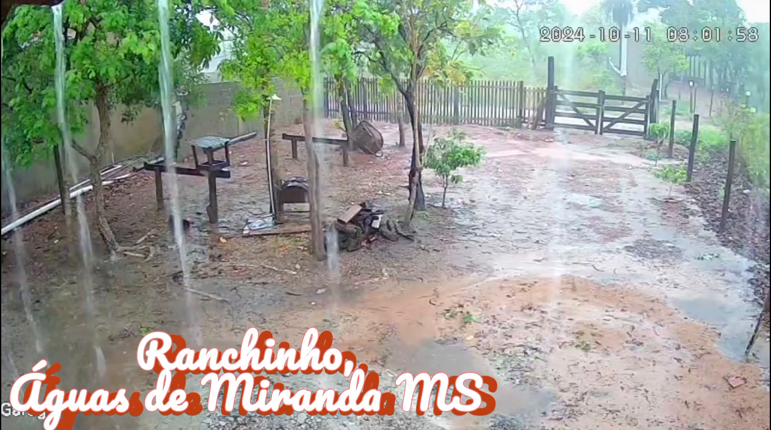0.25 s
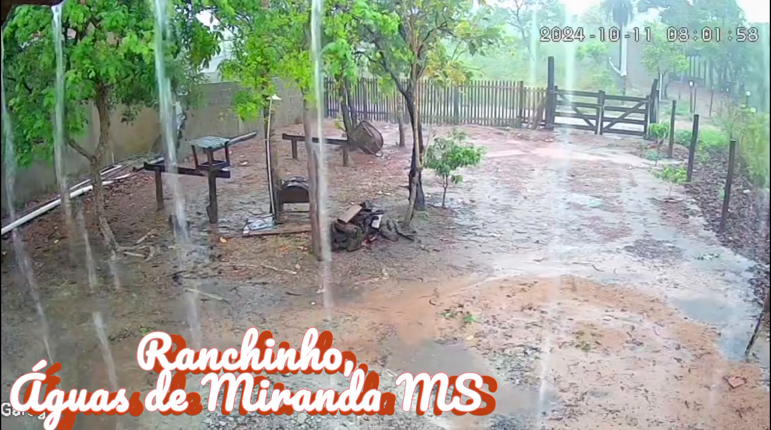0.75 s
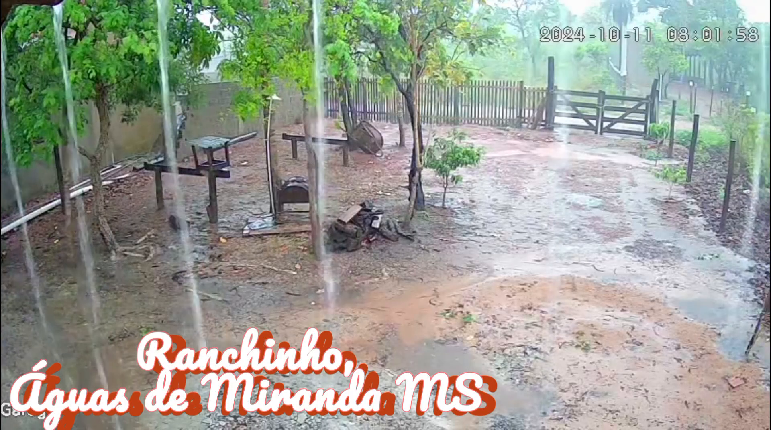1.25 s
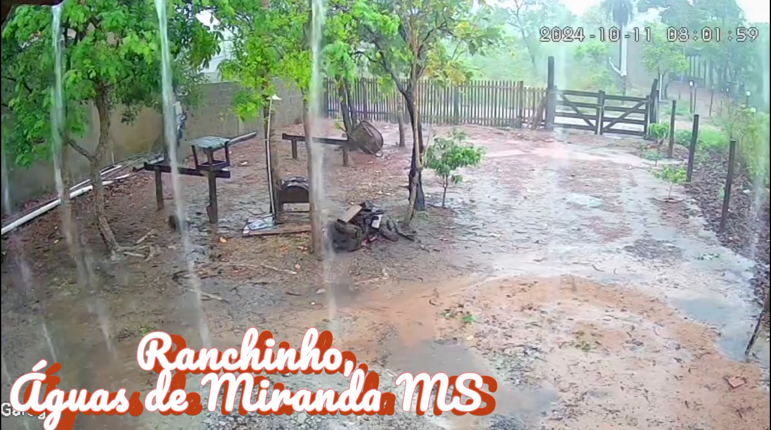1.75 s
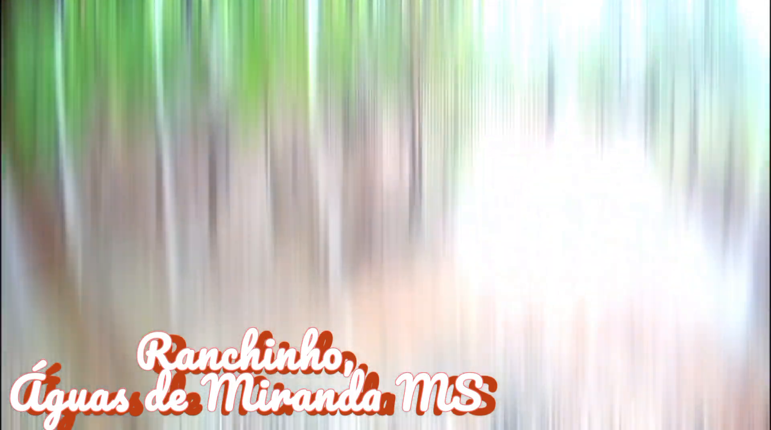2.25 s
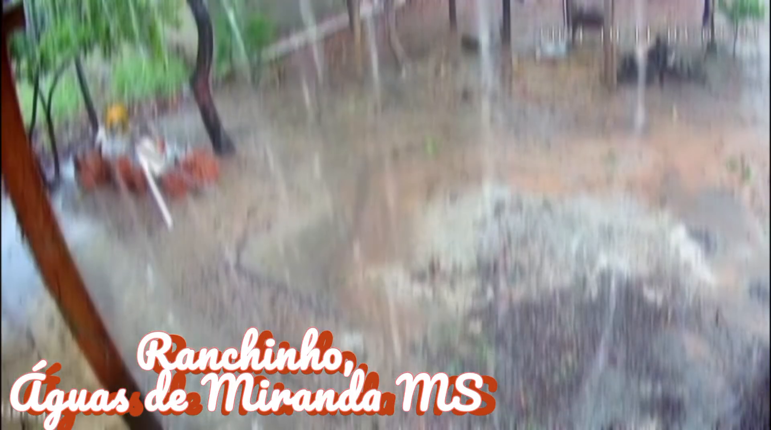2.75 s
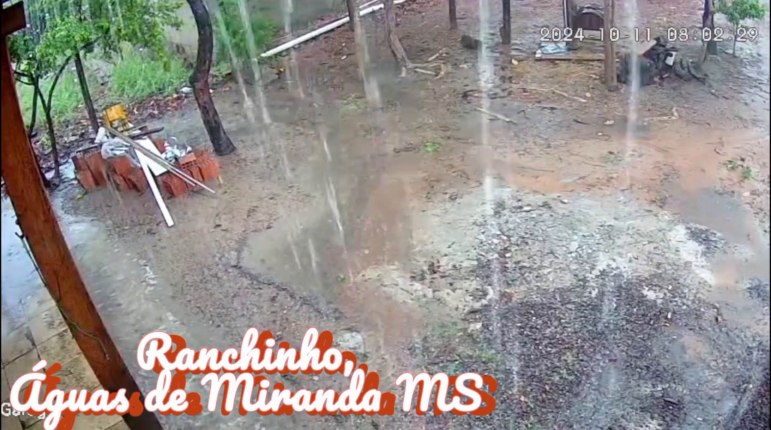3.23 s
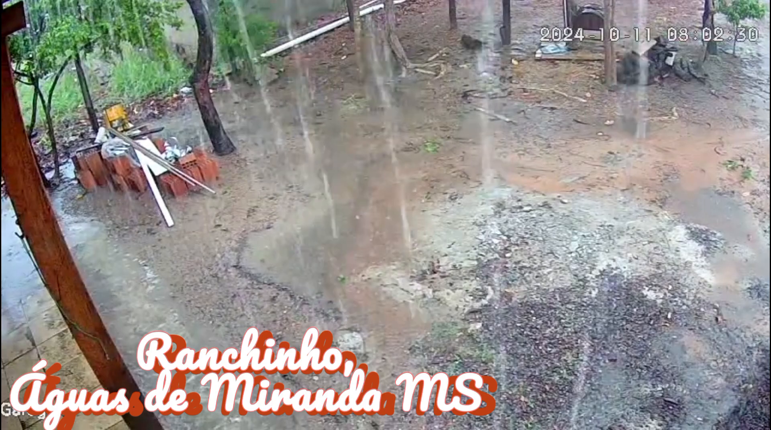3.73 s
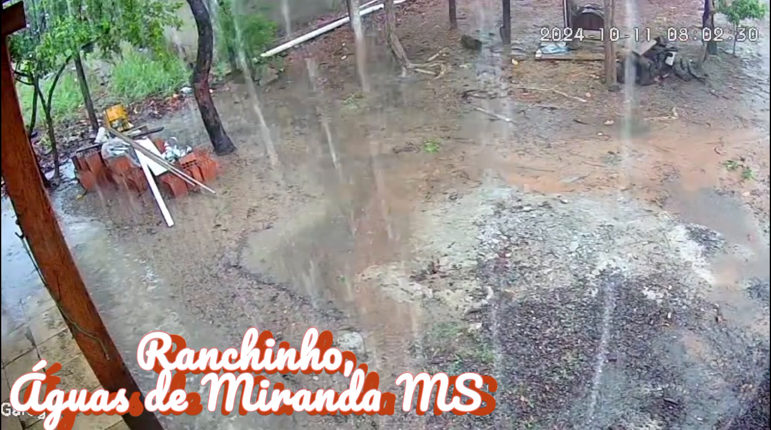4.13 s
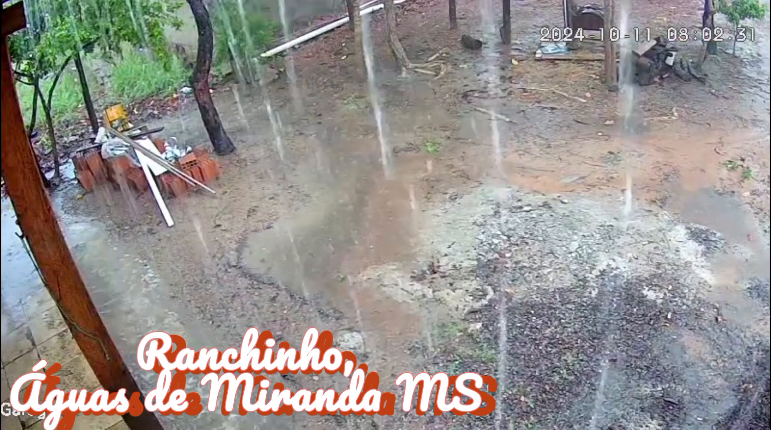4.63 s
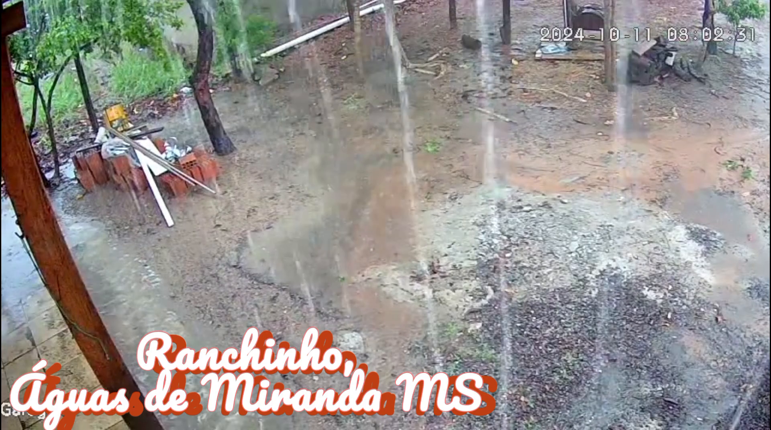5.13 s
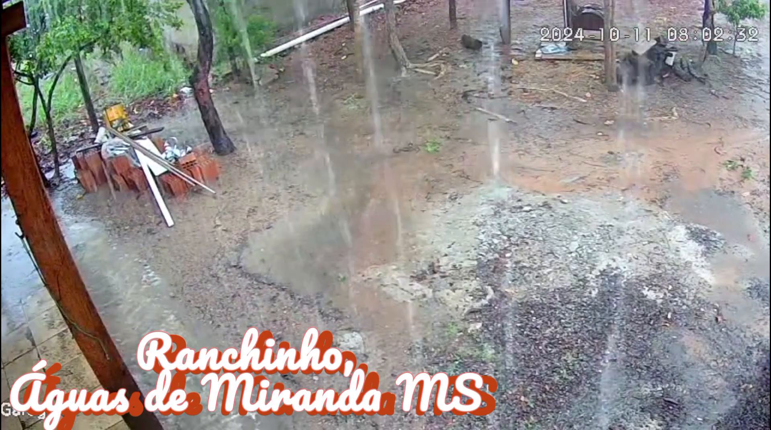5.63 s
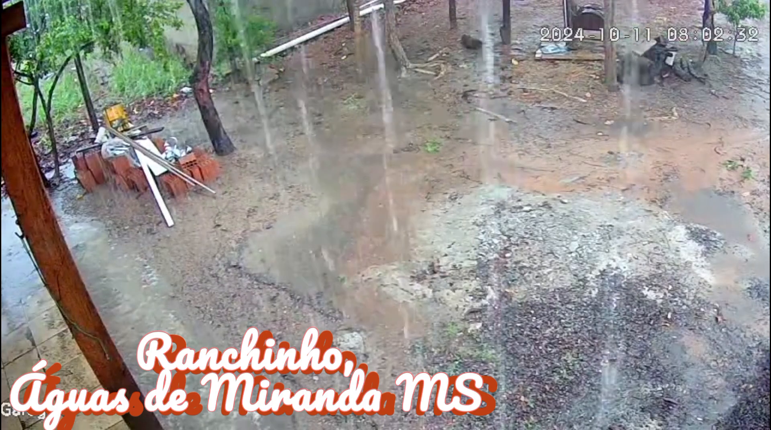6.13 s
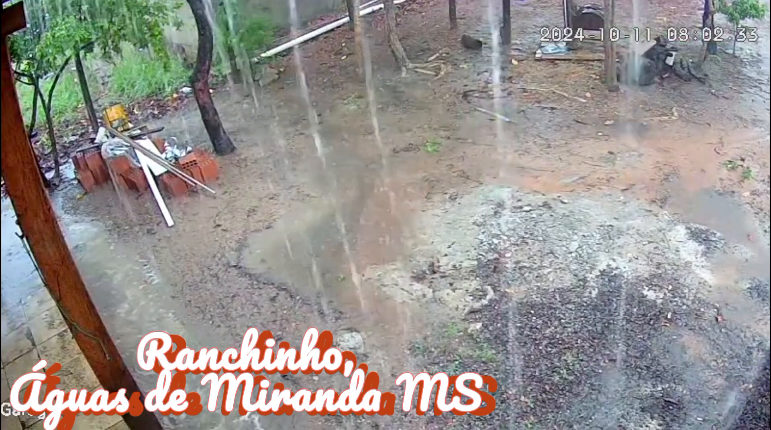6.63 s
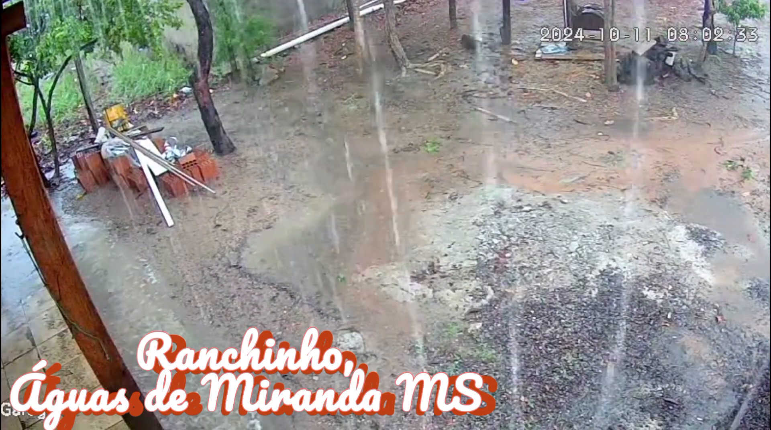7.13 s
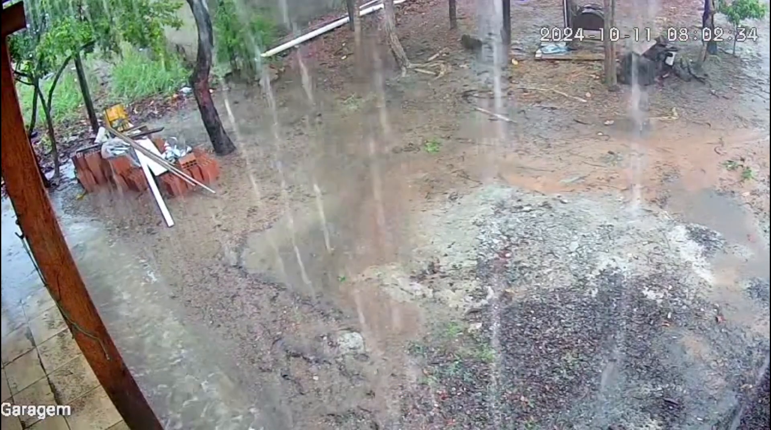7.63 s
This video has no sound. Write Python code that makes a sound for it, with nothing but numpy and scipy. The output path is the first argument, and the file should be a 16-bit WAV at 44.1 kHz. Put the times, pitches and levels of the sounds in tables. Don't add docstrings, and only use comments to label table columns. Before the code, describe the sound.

Quiet, thin rain hiss with scattered soft drips, then an abrupt jump to a loud downpour with sharp wet splats and low roof drumming.

```python
import sys
import numpy as np
from scipy import signal
from scipy.fft import rfft, irfft
from scipy.io import wavfile
from scipy.ndimage import uniform_filter1d

SR = 44100
rng = np.random.default_rng(int(sys.argv[2]) if len(sys.argv) > 2 else 0)


def boost(x):
    u = np.asarray(x, float) / 20
    return 10 ** u


def int16_out(signal):
    q = np.round(np.clip(np.atleast_2d(signal).T, -1, 1) * 32767)
    wavfile.write(sys.argv[1], SR, q.astype(np.int16))


N = 347508
CUT_S = 2.4335
DOWNPOUR, GUST = 1, 2


def by_camera(far, near):
    return np.where(np.arange(N) < CUT_S * SR, far, near)


def rain_db(column):
    # time in seconds, downpour level in dB, level of gusts on the roof in dB.
    rain = [
        [(0, -34, -50), (.3, -36.5, -50), (.48, -39.5, -51), (.76, -41, -47), (.82, -36.5, -51),
         (1.0, -39, -43.5), (1.17, -40, -57.5), (1.36, -42.5, -48), (1.5, -41.5, -54), (2.433, -43, -55)],
        [(2.434, -25, -32), (2.8, -24, -30), (3.3, -24.5, -32.5), (3.6, -24.5, -34), (4.8, -24.5, -34.5),
         (5.9, -24, -30.5), (6.6, -24, -33), (7.88, -23.5, -34)],
    ]
    rows = np.vstack(rain)
    return np.interp(np.arange(N) / SR, rows[:, 0], rows[:, column])


def evened(x):
    return x / np.sqrt(np.mean(x ** 2) + 1e-20)


def read(points, hz):
    f, value = np.transpose(points)
    return np.interp(np.log(hz + 1), np.log(f + 1), value)


def coloured(x, points):
    hz = np.fft.rfftfreq(N, 1 / SR)
    inside = (hz > points[0][0]) & (hz < points[-1][0])
    return evened(irfft(rfft(x) * boost(read(points, hz)) * inside, N))


def patchy(patch_db, flicker_db, patch_frames, patch_bins):
    frames = N // 64 + 5
    real, imaginary, patches = rng.standard_normal((frames, 129, 3)).T
    patches = uniform_filter1d(patches, patch_bins, 0)
    patches = evened(uniform_filter1d(patches, patch_frames, 1))
    flicker = evened(uniform_filter1d(rng.standard_normal(frames), patch_frames // 2))
    bins = (real + 1j * imaginary) * boost(patch_db * patches + flicker_db * flicker)
    noise = signal.istft(bins, nperseg=256, noverlap=192)[1]
    return evened(noise[:N])


def splat(hz, t60, width_hz, tick_db, noise):
    t = np.arange(len(noise)) / SR
    decay = boost(-60 * t / max(t60, .005))
    onset = np.minimum(t / .0015, 1)
    drive = noise * decay * onset
    drive[0] += boost(tick_db)
    radius = np.exp(-np.pi * width_hz / SR)
    poles = [1, -2 * radius * np.cos(2 * np.pi * hz / SR), radius * radius]
    sound = signal.lfilter([1, 0, -1], poles, drive)
    return sound / abs(sound).max()


def drops(per_s, spread_db, t60, count=14):
    struck = rng.random(N) < per_s / SR
    size = boost(spread_db * np.minimum(rng.exponential(1, N), 5)) * struck
    kind = rng.integers(0, count, N)
    out = np.zeros(N)
    for k, hz in enumerate(np.geomspace(900, 3700, count)):
        grain = splat(hz, t60, width_hz=0.38 * hz, tick_db=22, noise=rng.standard_normal(2048))
        out += signal.oaconvolve(size * (kind == k), evened(grain) * np.sqrt(hz))[:N]
    return evened(out)


def yard():
    # frequency in Hz, spectral level in dB per Hz.
    hiss_far = [(590, -43), (1000, -20.5), (1090, -14), (1320, -8), (1460, -12), (1760, -6.5), (1910, -5.5),
                (2160, -4.5), (2420, -10), (3150, -3.5), (3580, -4), (4650, -36), (7880, -120)]
    hiss_near = [(590, -30.5), (1000, -6), (1440, -6.5), (1900, -2), (2290, -4), (2790, -1), (3450, -2.5),
                 (3580, -1.5), (4650, -40), (7880, -120)]
    far = patchy(3.1, 0.83, patch_frames=28, patch_bins=3)
    far += boost(-8.5) * drops(per_s=250, spread_db=2.5, t60=0.1)
    near = patchy(1.2, 0.73, patch_frames=24, patch_bins=3)
    near += boost(-9.5) * drops(per_s=600, spread_db=2.0, t60=0.041)
    return boost(rain_db(DOWNPOUR)) * by_camera(coloured(far, hiss_far), coloured(near, hiss_near))


def roof():
    # frequency in Hz, spectral level in dB per Hz.
    drum = [(15, -51.5), (25, -17.5), (43, -33.5), (73, -10), (108, -0.5), (160, -0.5), (320, -11.5),
            (420, -40.5), (700, -120)]
    sway_db, gusts_per_s = 1.24, 8
    knots = rng.standard_normal(200)
    sway = sway_db * np.interp(np.arange(N) / SR * gusts_per_s, np.arange(200), knots)
    drumming = coloured(patchy(0.29, 0.87, patch_frames=40, patch_bins=2), drum)
    return boost(rain_db(GUST) + sway) * drumming


def puddles():
    # frequency in Hz, spectral level in dB per Hz.
    wash_far = [(160, -32), (280, -4), (306, 0.5), (375, -0.5), (438, 1), (678, -5.5), (792, -3.5),
                (904, -2.5), (1050, -6.5), (1360, -32), (2310, -120)]
    wash_near = [(160, -32.5), (280, -3.5), (367, 1.5), (690, -4.5), (832, 1), (1050, -9.5), (1360, -28),
                 (2310, -120)]
    far = coloured(patchy(3.7, 0.96, patch_frames=50, patch_bins=1), wash_far)
    near = coloured(patchy(0.48, 0.35, patch_frames=30, patch_bins=2), wash_near)
    pour, gust = rain_db(DOWNPOUR), rain_db(GUST)
    wash_db = pour + .12 * (gust - pour) + by_camera(-11, -8)
    return boost(wash_db) * by_camera(far, near)


def small_splats(count=60):
    per_s, mean_db, spread_db, low_hz, high_hz = 6, -19.5, 2.5, 1800, 3400
    wait, size, pitch = rng.random((count, 3)).T
    s = CUT_S + np.cumsum(-np.log(1 - wait)) / per_s
    peak_db = mean_db + spread_db * (2 * size - 1)
    rows = np.transpose([s, peak_db, low_hz + pitch * (high_hz - low_hz)])
    return rows[s < N / SR]


def streams():
    # time in seconds, peak level in dB, pitch in Hz.
    splats_far = [(0.0368, -15.5, 2900), (0.0854, -20, 1800), (0.1624, -28, 2760), (0.1834, -26, 2870),
                  (0.2448, -28, 3280), (0.2638, -21, 3020), (0.3267, -19.5, 2730), (0.4015, -23.5, 3490),
                  (0.5437, -31, 3440), (0.5866, -22.5, 3190), (0.7078, -28, 3430), (0.7981, -20.5, 2870),
                  (0.8724, -23, 2180), (0.9592, -22, 2530), (0.9827, -16.5, 2210), (1.065, -23, 3100),
                  (1.1124, -21, 3140), (1.2166, -24.5, 1980), (1.4481, -24, 1870), (1.6018, -27, 3500),
                  (1.699, -28, 3380), (1.7264, -30, 3180), (1.8073, -32, 1870), (1.8861, -32, 2920),
                  (1.955, -22.5, 3320), (2.1301, -26, 1960), (2.1475, -21.5, 3150), (2.2084, -27.5, 2900),
                  (2.3092, -28, 3540), (2.389, -28.5, 2190)]
    splats_near = [(2.5391, -7.5, 3200), (2.7043, -7, 2440), (2.7566, -9, 2820), (3.1497, -8.5, 1830),
                   (3.2544, -6.5, 2070), (3.2954, -11, 1560), (3.482, -9.5, 3240), (3.5394, -13.5, 2650),
                   (3.6954, -12, 3230), (4.0517, -7, 2440), (4.2454, -12, 3290), (4.4313, -10, 3250),
                   (4.8409, -10.5, 1890), (4.9831, -6.5, 1960), (5.035, -11.5, 2590), (5.446, -6, 2850),
                   (5.6111, -7, 2730), (5.7159, -9, 3580), (5.7473, -6, 2720), (5.9254, -8, 2830),
                   (6.117, -5, 3290), (6.323, -9, 2520), (6.3804, -12, 2090), (6.5131, -4.5, 3550),
                   (6.5484, -10.5, 2870), (6.6258, -11, 3210), (6.6997, -13, 2700), (7.0913, -4, 2280),
                   (7.6884, -10, 2830), (7.8351, -7, 1840)]
    splats_beside = [(2.4932, -11.5, 3280), (2.5132, -6.5, 2130), (2.8674, -10, 2750), (2.9724, -12, 3210),
                     (3.0084, -11.5, 2790), (3.4012, -12, 2530), (3.4321, -10.5, 3000),
                     (3.6631, -9.5, 3060), (3.8432, -10, 2730), (3.9394, -14, 2550), (4.1304, -10.5, 1880),
                     (4.1719, -11.5, 3130), (4.2614, -10.5, 2720), (4.59, -12.5, 2000),
                     (4.6658, -11.5, 1880), (4.7431, -6, 1970), (5.1627, -9, 1750), (5.2046, -10.5, 2560),
                     (5.4284, -4.5, 3100), (5.6635, -7, 3410), (5.9065, -9, 2750), (6.0382, -10.5, 2690),
                     (6.1744, -8.5, 3000), (6.2058, -9.5, 2720), (6.2464, -11, 2790), (7.2884, -11, 2410),
                     (7.6384, -11, 2800), (7.6605, -9, 3070), (7.7584, -12.5, 3280), (7.7967, -10.5, 2470)]
    lag_s, top_hz = .0007, 3130
    echo_s, echo_db = .0132, -9
    # rows, trim in dB, decay to -60 dB in seconds, bandwidth in Hz, tick in dB.
    groups = ((splats_far, -1, .16, 599.5, 18.5),
              (splats_near, 3, .08, 1300, 20.4),
              (splats_beside, .5, .05, 1200, 21),
              (small_splats(), .5, .05, 1200, 21))
    out = np.zeros(N + 5000)
    for rows, trim_db, t60, width_hz, tick_db in groups:
        for (s, db, hz), noise in zip(rows, rng.standard_normal((len(rows), 5000))):
            burst = splat(min(hz, top_hz), t60, width_hz, tick_db, noise)
            out[round((s + lag_s) * SR):][:5000] += boost(db + trim_db) * burst
    echo = boost(echo_db) * np.roll(out, round(echo_s * SR))[:N]
    return out[:N] + by_camera(0, echo)


def scene():
    return (yard() + roof() + puddles() + streams())[None]


def top_cut(x):
    return signal.sosfilt(signal.butter(12, 15440, fs=SR, output="sos"), x)


def record(dry):
    # frequency in Hz, gain in dB.
    playback = [(3600, 1), (4400, -5), (4700, -10.5), (5000, -17), (5300, -23), (5600, -33), (5900, -45),
                (6080, -64), (6600, -76), (7800, -69.5), (10800, -74.5), (15000, -71.5)]
    camera_rate, camera_edge = 8000, 3615
    gap_s, fade_in_s = .004, .009
    t, hz = np.arange(N) / SR, np.fft.rfftfreq(N, 1 / SR)
    narrow = irfft(rfft(dry) / (1 + (hz / camera_edge) ** 400), N)
    clock = 2 * np.pi * camera_rate * t
    sampled = narrow * (1 + 2 * np.cos(clock) + 2 * np.cos(2 * clock))
    played = irfft(rfft(sampled) * boost(read(playback, hz)), N)
    dip_times = [CUT_S - .002, CUT_S, CUT_S + gap_s, CUT_S + gap_s + fade_in_s]
    splice = np.sin(np.interp(t, dip_times, [1, 0, 0, 1]) * np.pi / 2) ** 2
    air = boost(-93) * rng.standard_normal(N)
    return top_cut(played * splice + air)


dry = scene()
out = record(dry)
int16_out(out)
```